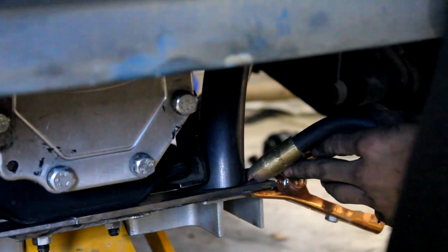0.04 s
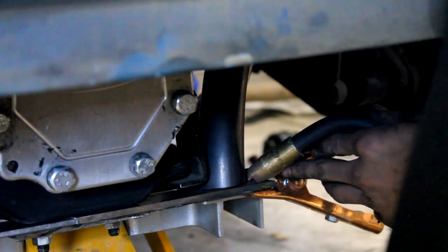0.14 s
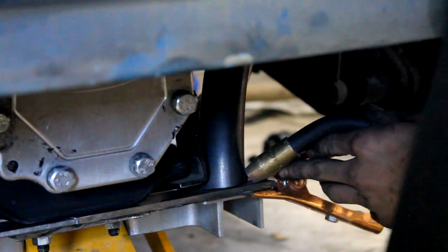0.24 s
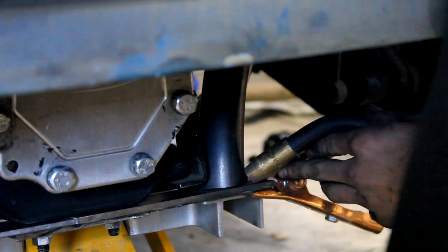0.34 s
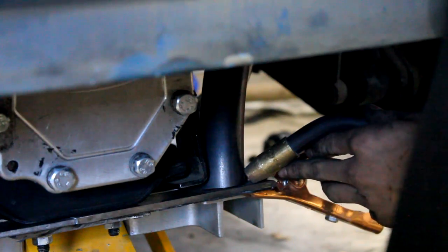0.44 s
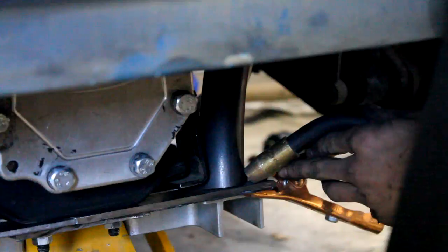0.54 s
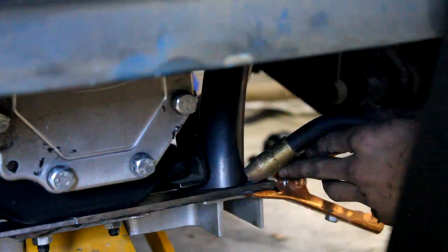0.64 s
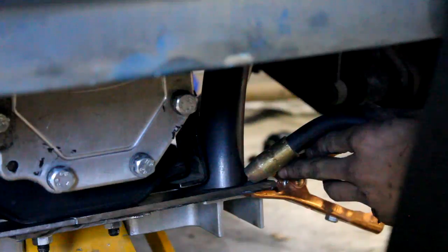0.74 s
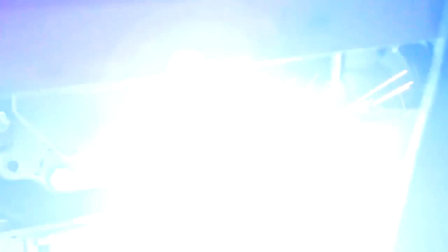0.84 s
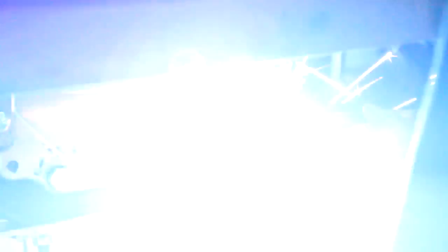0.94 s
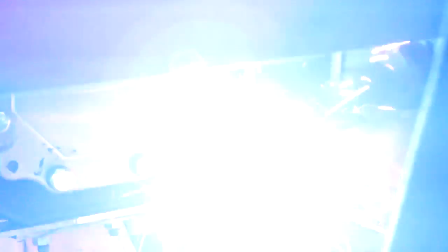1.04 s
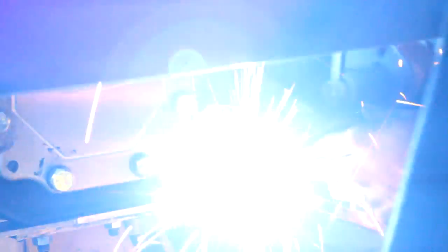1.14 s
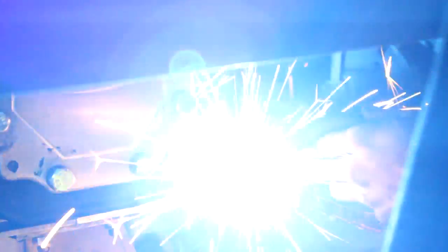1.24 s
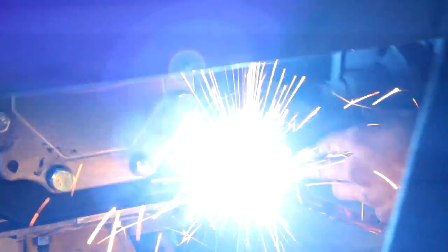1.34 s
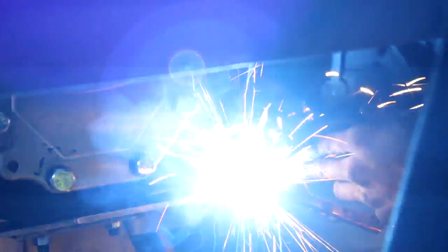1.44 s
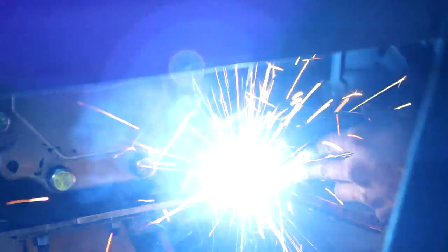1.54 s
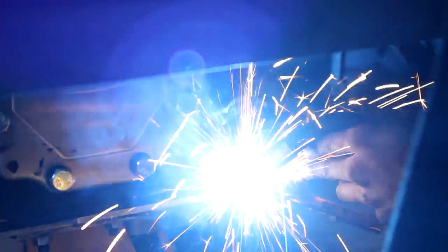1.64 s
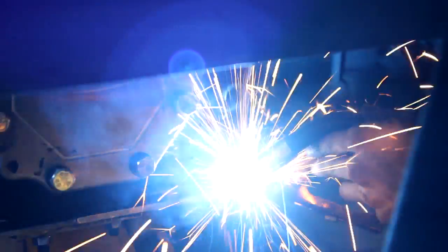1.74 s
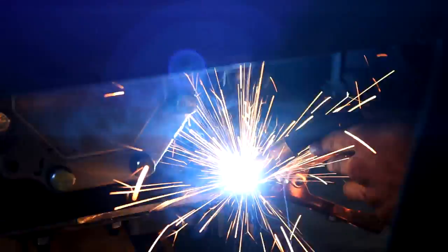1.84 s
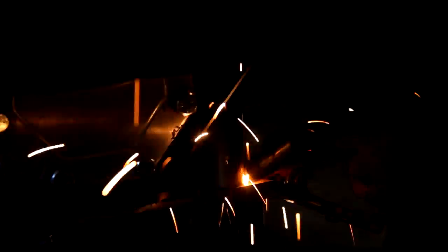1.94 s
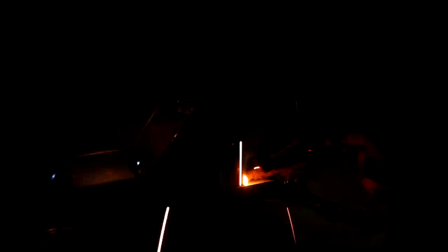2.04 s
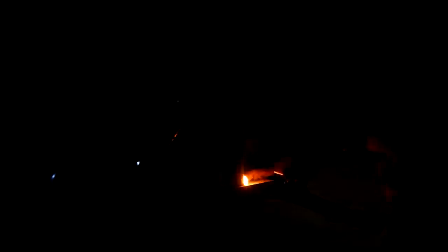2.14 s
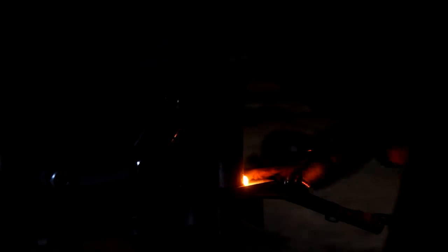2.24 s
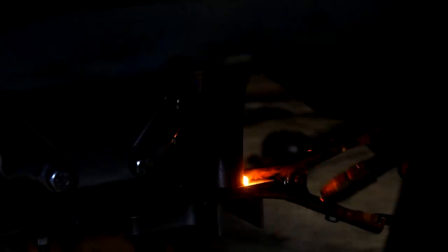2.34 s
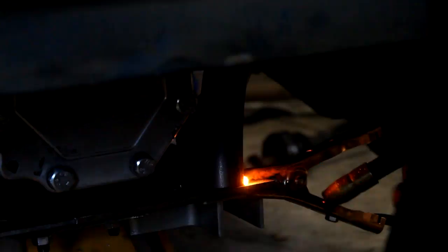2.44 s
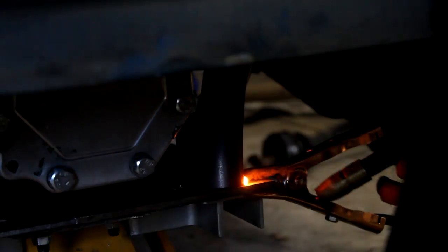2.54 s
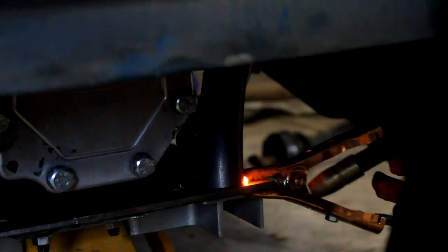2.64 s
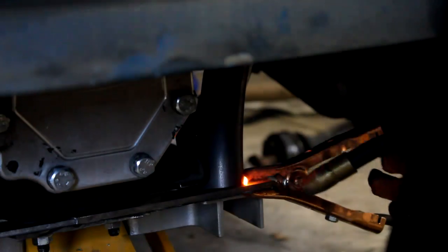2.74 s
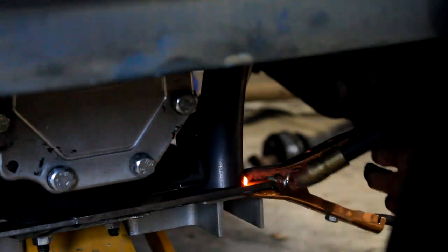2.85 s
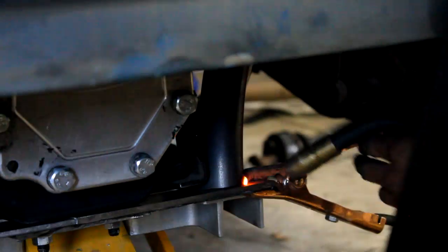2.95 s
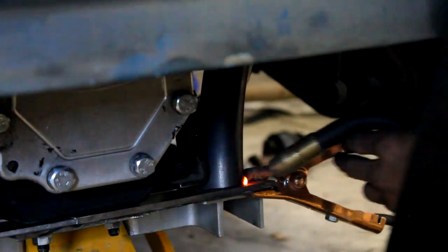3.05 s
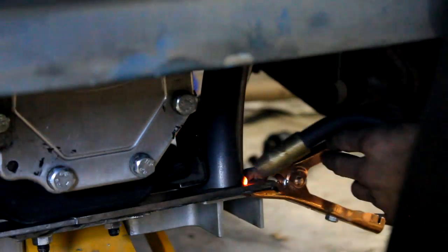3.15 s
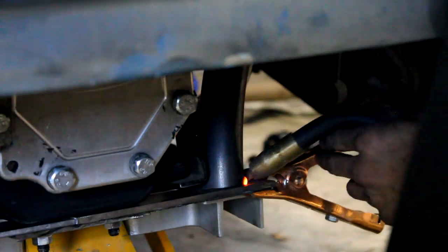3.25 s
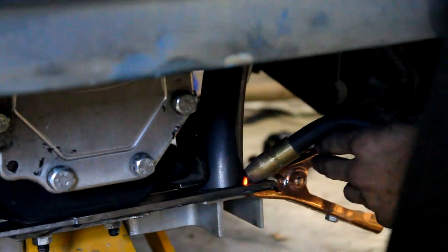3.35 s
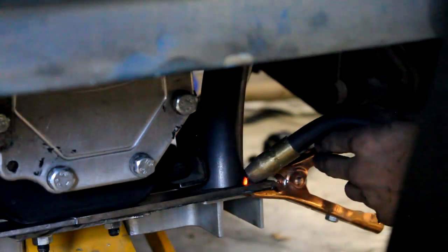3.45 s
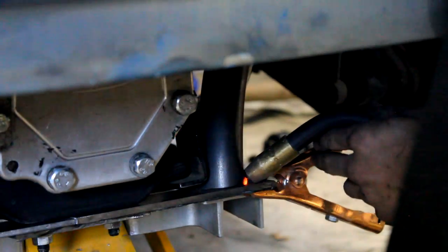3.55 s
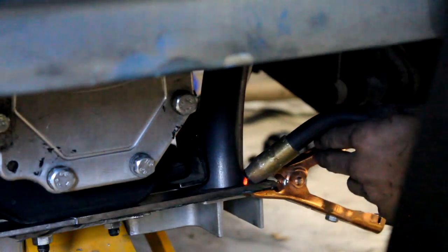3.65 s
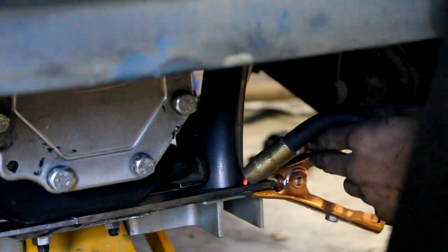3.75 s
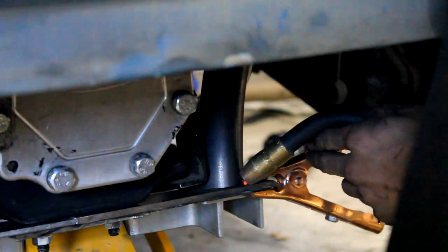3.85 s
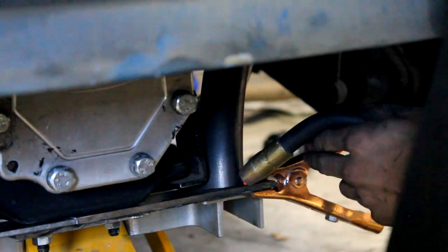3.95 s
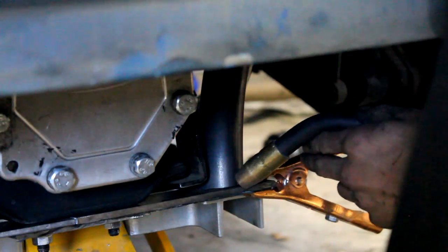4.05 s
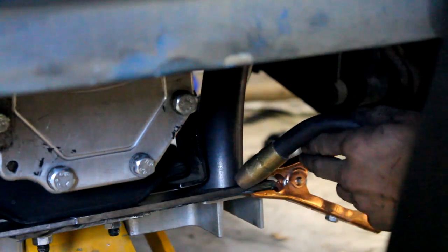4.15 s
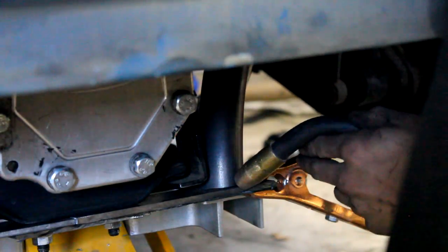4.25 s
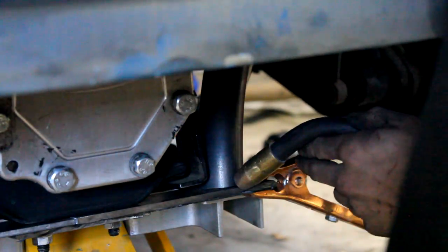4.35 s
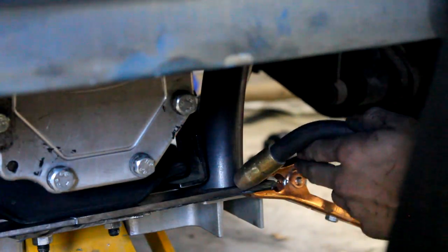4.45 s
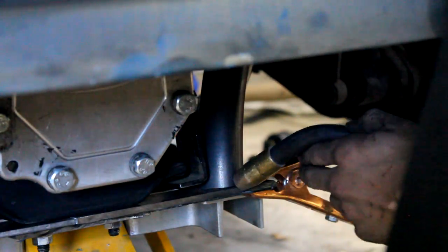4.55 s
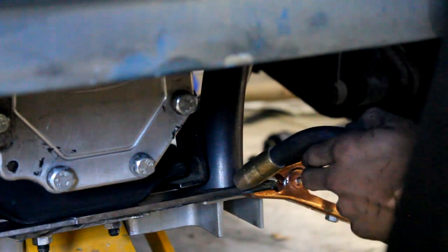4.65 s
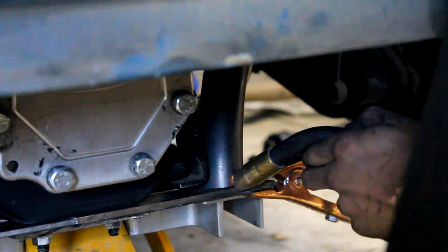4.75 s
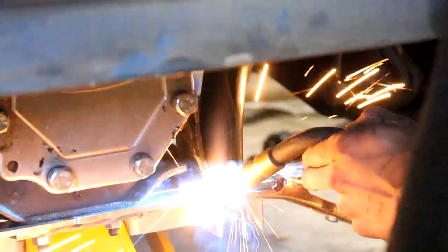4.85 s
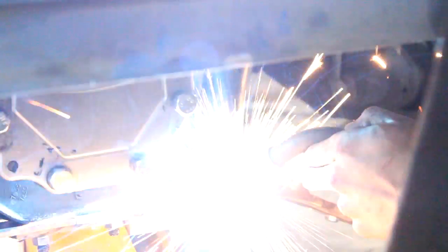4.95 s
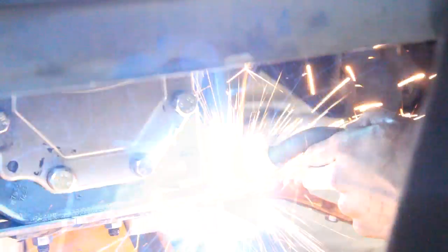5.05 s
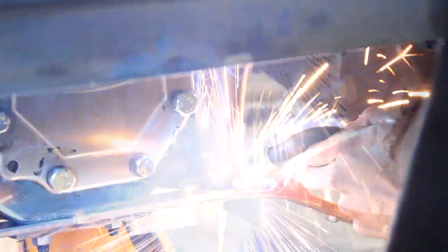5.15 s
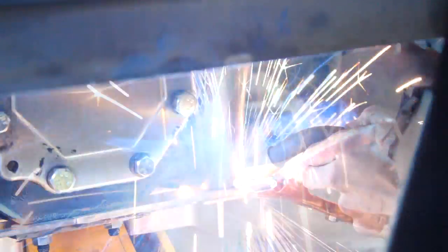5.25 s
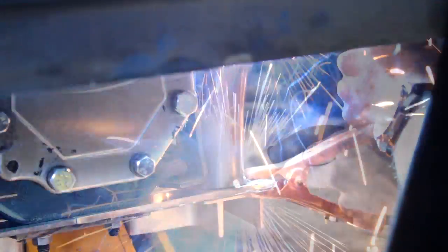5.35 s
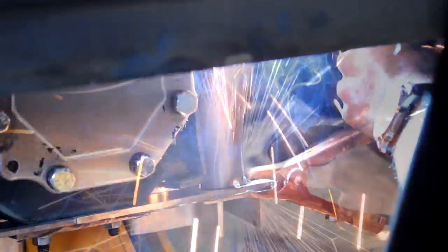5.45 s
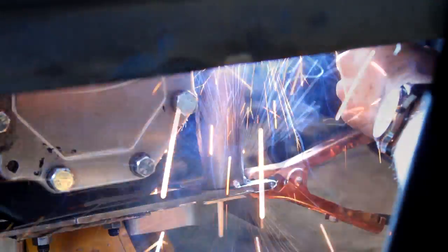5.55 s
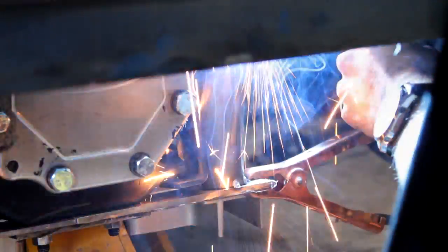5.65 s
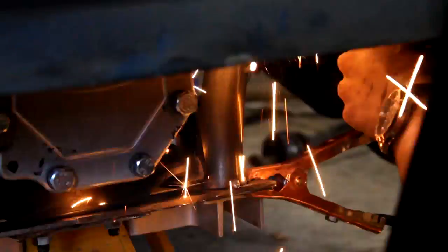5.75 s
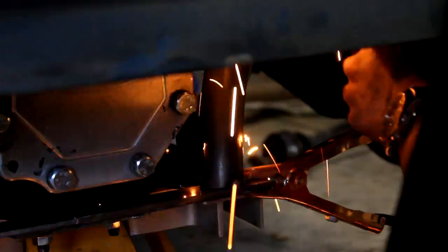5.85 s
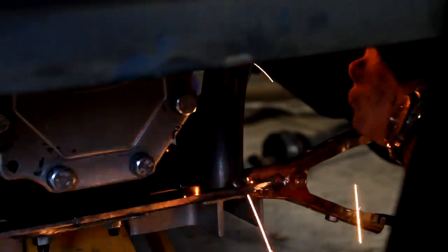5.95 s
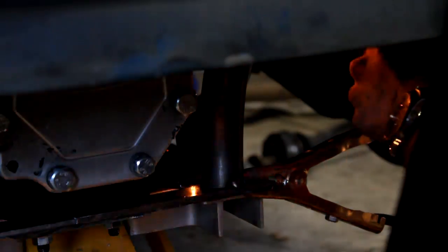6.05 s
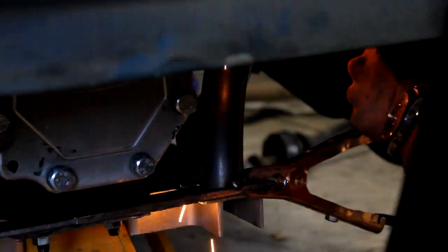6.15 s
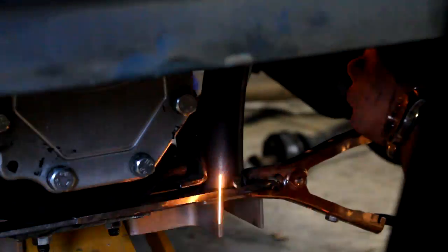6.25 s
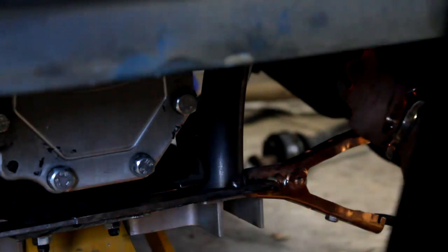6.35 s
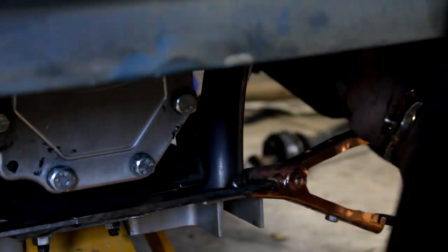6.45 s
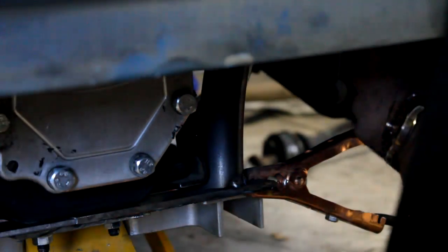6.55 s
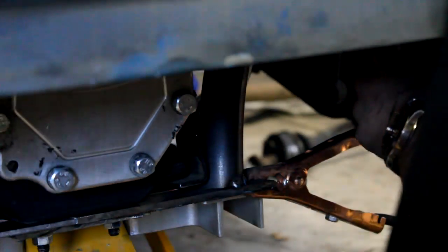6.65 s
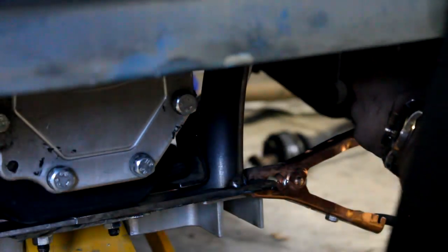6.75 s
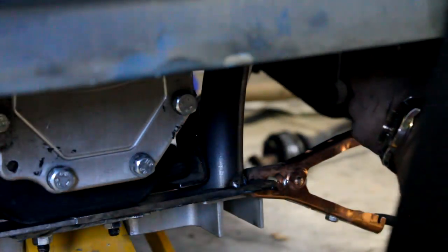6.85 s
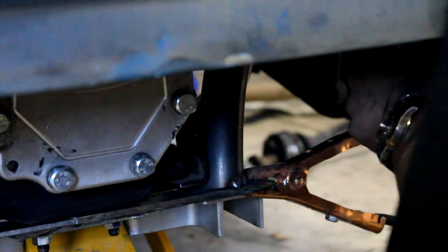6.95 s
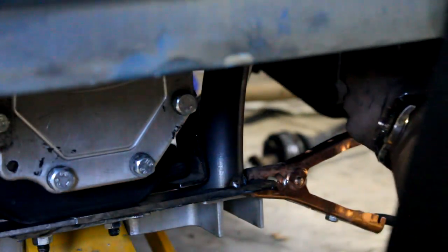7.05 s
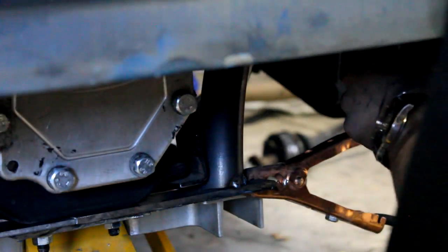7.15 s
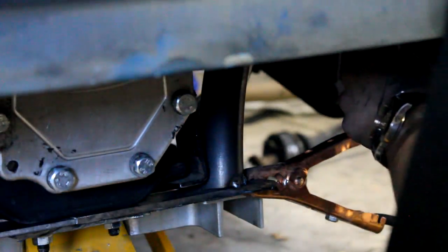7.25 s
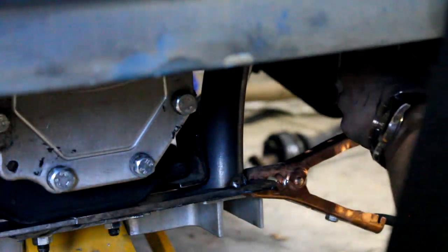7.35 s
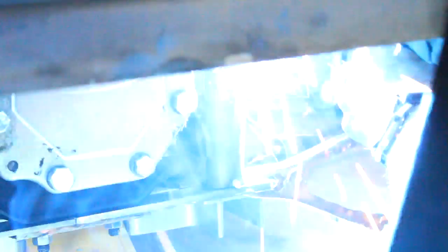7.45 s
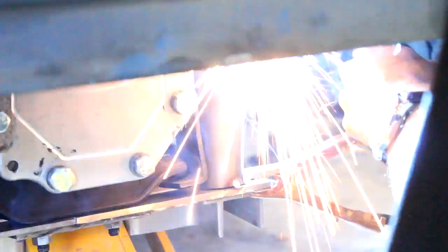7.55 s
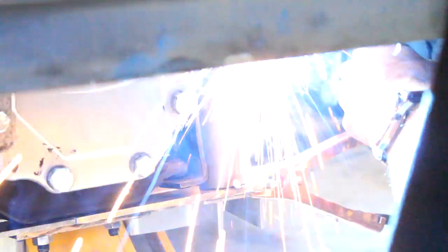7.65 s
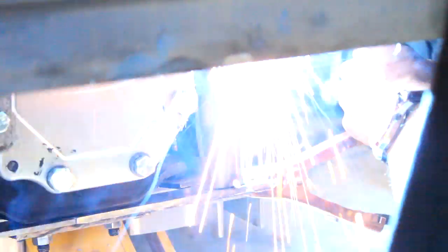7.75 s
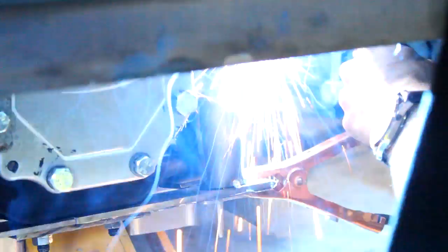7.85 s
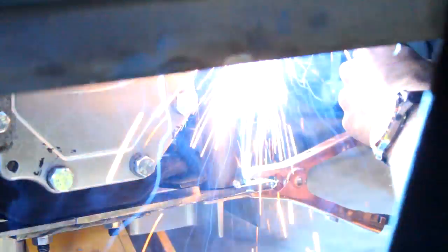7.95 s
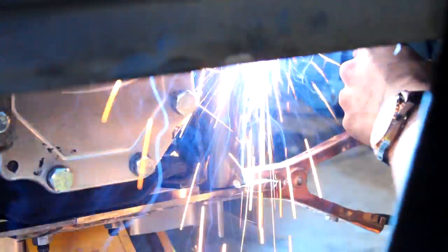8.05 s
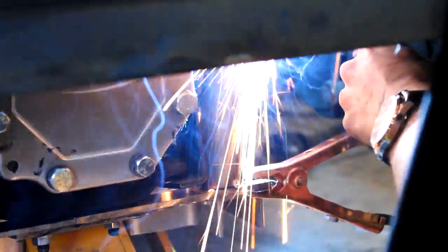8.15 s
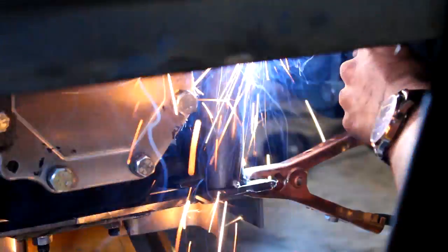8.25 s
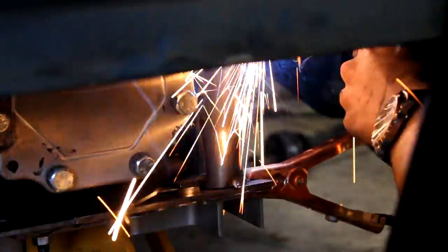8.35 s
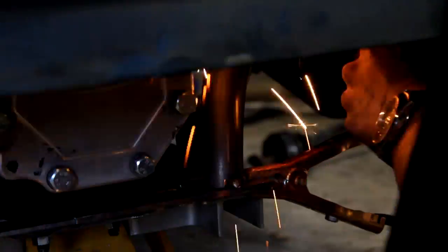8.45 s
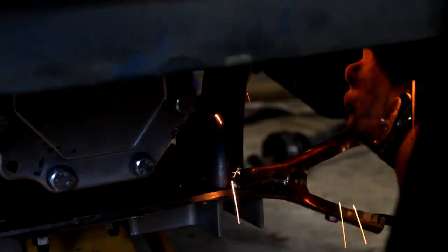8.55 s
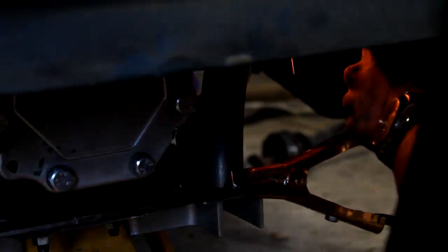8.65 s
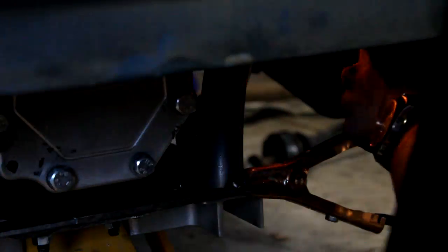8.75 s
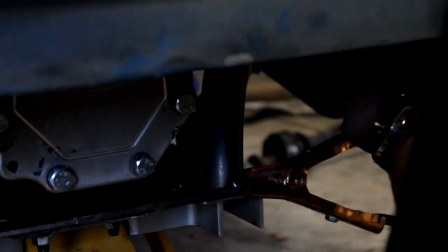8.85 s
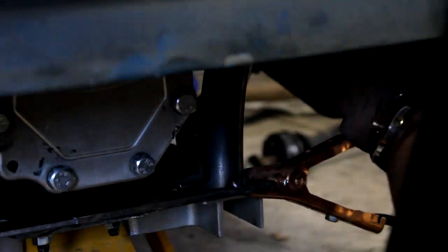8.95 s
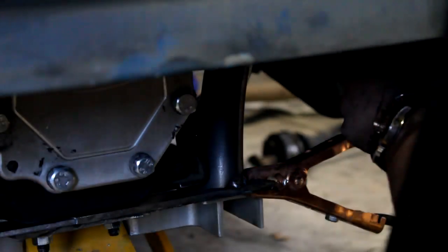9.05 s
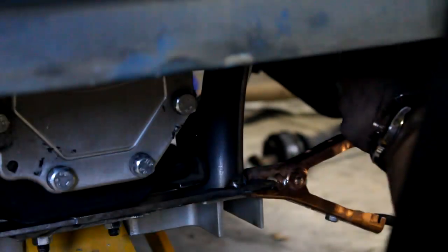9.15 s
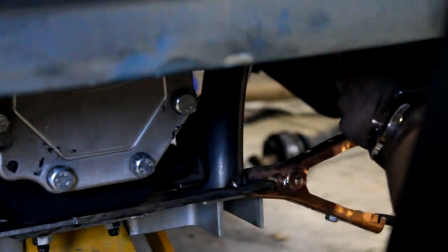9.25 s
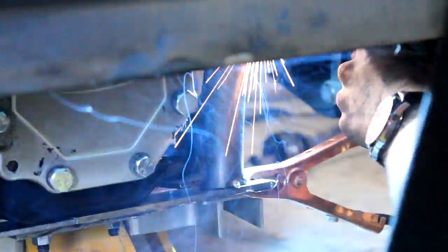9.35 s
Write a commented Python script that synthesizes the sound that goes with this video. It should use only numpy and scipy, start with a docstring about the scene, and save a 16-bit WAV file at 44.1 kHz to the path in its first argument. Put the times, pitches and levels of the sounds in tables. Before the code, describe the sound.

Close, bright welding tacks snap and pop on steel tube under a car, separated by quiet fan hum and tiny metallic ticking.

```python
"""In a garage, a wire-feed welder lays three tack welds on a steel tube under a car, close to the microphone.
A fan hums and faint ticks go on throughout. At 0.9 s the wire strikes with loud pops; the first tack follows,
its wire shorting and snapping about once per mains ripple, each snap scattering off the steel into the room.
At 3.4 s the torch clinks as it is set down. A hard strike with a puff of air opens the second tack at 4.9 s;
weaker pops begin the third at 7.5 s, which settles into an even buzz and fades, leaving the fan and ticks."""
import sys
import numpy as np
from scipy import signal
from scipy.fft import rfft, irfft
from scipy.io import wavfile
from scipy.ndimage import uniform_filter1d

SR = 44100
rng = np.random.default_rng(int(sys.argv[2]) if len(sys.argv) > 2 else 0)


def dump(signal):
    """Clip the signal to [-1, 1] and save it as 16-bit WAV at the path in sys.argv[1]."""
    limited = np.clip(np.atleast_2d(signal).T, -1, 1)
    pcm = np.round(limited * 32767).astype(np.int16)
    wavfile.write(sys.argv[1], SR, pcm)


N = 414540
TIME = np.arange(N) / SR  # seconds


def undb(db):
    """Turn decibels into a gain."""
    return 10 ** (np.asarray(db) / 20)


def unit(x):
    """Scale a sound to an rms level of 1."""
    return x / np.sqrt(np.mean(x ** 2))


def along(table, hz):
    """Read between (Hz, value) points, with pitch on a log scale."""
    f, value = np.transpose(table)
    return np.interp(np.log(hz + 1e-3), np.log(f), value)


def through(x, response):
    """Pass a sound through an impulse response."""
    return signal.oaconvolve(x, response)[:len(x)]


def clicks(times, sizes):
    """Place one single-sample click at each time in seconds."""
    places = np.clip(np.asarray(times) * SR, 0, N - 1).astype(int)
    return np.bincount(places, sizes, N)


def noise(gain):
    """Make noise of rms 1 whose spectrum follows gain(Hz)."""
    spectrum = rfft(rng.standard_normal(N))
    return unit(irfft(spectrum * gain(np.fft.rfftfreq(N, 1 / SR)), N))


def wander(rate_hz):
    """Drift slowly at random, with a spread of 1."""
    return noise(lambda hz: (hz > rate_hz / 2) * np.exp(-(hz / rate_hz) ** 2))


def fading(fall_s, size=1024):
    """An envelope with a sudden start and an exponential fall."""
    return np.exp(-np.arange(size) / SR / fall_s)


def lasting(length_s, size=1024):
    """An envelope with a sudden start, a plateau and a quick end."""
    return np.exp(-(np.arange(size) / SR / length_s) ** 8)


def colour(spectrum, modes=(), size=4096):
    """A response of unit energy that never sounds early: a broad spectrum lifted by resonances."""
    hz = np.fft.rfftfreq(size, 1 / SR)
    db = along(spectrum, hz)
    for f, width, lift in modes:
        db = db + lift * .5 ** ((2 * (hz - f) / width) ** 2)
    # keeping only the first half of the cepstrum packs the energy towards the start
    cepstrum = irfft(np.log(undb(db)))
    h = irfft(np.exp(rfft(2 * cepstrum[:size // 2], size)))
    return h / np.linalg.norm(h)


def scatter(gate, count=4):
    """A nearly colourless cluster of echoes, of unit energy, shaped by an envelope."""
    h = rng.standard_normal(len(gate)) * gate
    for _ in range(count):
        h = irfft(np.exp(1j * np.angle(rfft(h))))  # make every pitch equally strong
        local_power = uniform_filter1d(h ** 2, size=24)
        h = h * gate / np.sqrt(local_power + 1e-9)  # put the envelope back
    return h / np.linalg.norm(h)


# How long the garage rings. Each row: pitch in Hz, time to fall by 60 dB in seconds.
GARAGE_DECAY = [(300, 0.44), (2600, 0.63), (7000, 0.37), (14000, .27)]


def garage(early_db=-7, early_fall_s=.018, late_db=-4.0, size=32768):
    """Echoes from the car and the floor, then the room's tail, whose high treble dies away soonest."""
    t, hz = np.arange(size) / SR, np.fft.rfftfreq(size, 1 / SR)
    band = hz // 1500  # slices 1500 Hz wide, each with its own decay
    spectrum = rfft(rng.standard_normal(size))
    late = 0
    for b in np.unique(band):
        t60 = along(GARAGE_DECAY, hz[band == b].mean())
        late = late + irfft(spectrum * (band == b)) * 1000 ** (-t / t60)
    arrived = t > .004
    early = scatter(arrived * fading(early_fall_s, size=size), count=1)
    return undb(early_db) * early + undb(late_db) * arrived * late / np.linalg.norm(late)


# The rushing air of the fan. Each row: pitch in Hz, relative level in dB.
FAN_RUSH = [(25, -21.5), (60, -18), (95, -6.5), (135, -13.5), (170, -4.5), (255, -2), (320, -9), (550, -5),
            (850, -7.5), (1400, -11.5), (2500, -17.5), (4400, -22.5), (7000, -36.5), (11000, -35),
            (15500, -49.5)]
# The hum of the fan. Each row: pitch in Hz, level in dB before the shared hum_db.
FAN_HUM = [(53.8, -79.5), (91.5, -62.5), (220.7, -53.5), (409.1, -56.5), (662.1, -58), (759.0, -53),
           (1066, -78), (1222, -58), (1502, -58), (2309, -63)]


def fan(rush_db=-46.5, hum_db=-2, blur=0.019):
    """Rushing air, with wavering tones made of narrow noise, wider the higher they lie."""
    rush = undb(rush_db) * noise(lambda hz: undb(along(FAN_RUSH, hz)))
    tones = 0
    for f, db in FAN_HUM:
        tone = noise(lambda hz: 1 / (1 + ((hz - f) / (blur * f)) ** 2))
        tones = tones + undb(db + hum_db) * tone
    return rush + tones


# The broad colour of the ticks. Each row: pitch in Hz, relative level in dB.
TICK_SPECTRUM = [(1000, -22.5), (3000, 0.5), (5500, -3.5), (9500, -2), (13000, -8), (15500, -16)]
# The ringing of the ticks. Each row: pitch in Hz, width in Hz, lift in dB.
TICK_MODES = [(5550, 220, 7), (6980, 58, 6), (9150, 70, 6.2), (11050, 110, 3.8)]


def ticking(faint_db=-33.5, spread_db=8, rarity=1.9, near=0.3, count=480):
    """Small dry ticks at random, a few clear ones among many faint ones, heard mostly through the room."""
    when, size = rng.random((count, 2)).T
    times = (np.arange(count) + 2 * when) / count * N / SR
    ticks = clicks(times, undb(faint_db + spread_db * size ** rarity))
    x = through(ticks, colour(TICK_SPECTRUM, TICK_MODES))
    return near * through(x, scatter(fading(.005))) + through(x, garage(early_db=-12.5, late_db=0.5))


# The wire pops, as the arc is struck or when it stubs into the puddle.
# Each row: time in seconds, relative strength in dB.
WIRE_POPS = [(0.8752, -16.5), (0.889, -15.5), (0.9149, 2.5), (0.9682, 1), (0.9804, 5), (1.037, 7),
             (4.8635, 8), (4.9406, 0), (4.9574, 4), (4.9826, 5.5), (5.225, 3), (5.3217, 6.5), (5.443, 4),
             (5.781, 1), (7.4708, -3), (7.5708, 0.5), (7.5879, -4.5), (7.8483, 0), (7.9498, 2.5),
             (8.036, 1)]


def pops(start, stop, pop_db=14, pop_lag_s=0.00094):
    """The bare bursts of one tack, as single clicks: each burst sounds pop_lag_s after its listed time."""
    at, db = np.transpose(WIRE_POPS)
    mine = (at > start - .5) & (at < stop + .5)
    return clicks(at + pop_lag_s, mine * undb(db + pop_db))


SPUTTER = .7  # unsteadiness of a freshly lit arc, 0-1
SETTLE_S, ENDING_S = .07, 0.14  # seconds to find the even buzz, and for the wire feed to run down
WOBBLE_HZ, WOBBLE_DB = 12, 0.16  # the hand varies the arc's length, and with it the level


def effort(settles, stop, sputter_db, settled_db, ending_db, settled_unsteady):
    """Level in dB and unsteadiness of one arc: it sputters, settles, then holds, fades or flares."""
    settled = np.clip(.5 + (TIME - settles) / SETTLE_S, 0, 1)
    ending = np.clip(1 + (TIME - stop) / ENDING_S, 0, 1)
    db = sputter_db + (settled_db - sputter_db) * settled
    db = db + ending_db * ending + WOBBLE_DB * wander(WOBBLE_HZ)
    return db, SPUTTER + (settled_unsteady - SPUTTER) * settled


RIPPLE_HZ = 120  # ripples per second of the rectified mains


def arc(start, stop, db, unsteady, arc_db=-1.45, timing_s=.0018, size_db=2.0, spit_db=-8.5, sizzle_db=-17):
    """The wire shorts once per ripple, early or late when unsteady; spatter spits and the arc sizzles between."""
    beats = np.arange(N * RIPPLE_HZ // SR) / RIPPLE_HZ
    late, size, spit_size, spit_at = rng.standard_normal((len(beats), 4)).T
    loose = np.interp(beats, TIME, unsteady)
    # an unsteady arc varies more in both timing and strength
    snap_gain = undb(size_db * (1.0 + loose) * np.minimum(size, 1.5))
    snaps = clicks(beats + timing_s * loose * late, snap_gain)
    spit_gain = loose * undb(spit_db + 3.1 * np.minimum(spit_size, 2))
    spits = clicks(beats + spit_at / RIPPLE_HZ, spit_gain)
    sizzle = undb(sizzle_db) * rng.standard_normal(N)
    burning = (TIME > start) & (TIME < stop)
    return burning * undb(db + arc_db) * (unit(snaps + spits) + sizzle)


def nearby(x, indirect, crack_s=.0005, steel_s=.004, sway_hz=0.4954):
    """A snap arrives as a short crack and a cluster of echoes off the steel."""
    share = np.clip(indirect, 0, 1)
    sound = through(x * np.sqrt(1 - share), scatter(lasting(crack_s)))
    sway = 2 * np.pi * sway_hz * TIME  # the hand moves, so one set of echo paths gives way to another
    for weight in (np.cos(sway), np.sin(sway)):
        sound = sound + through(x * np.sqrt(share) * weight, scatter(lasting(steel_s)))
    return sound


# The three tacks. Each row: arc lights in seconds, settles in seconds, goes out in seconds,
# relative sputtering level in dB, relative settled level in dB, change at the end in dB,
# settled unsteadiness from 0 to 1, share of the sound's energy that comes by way of the steel from 0 to 1.
TACK_WELDS = [(1.045, 1.35, 1.92, -11.7, -11.5, 0, .33, .3),
              (4.96, 5.25, 5.805, -9.3, -12.6, 3.5, .55, .35), (7.6, 8.12, 8.42, -16, -8.7, -4.5, .15, .75)]
# The colour of a snap. Each row: pitch in Hz, relative level in dB at the first, second and third torch position.
SNAP_COLOUR = [(130, -31, -39, -37.5), (246, -16.5, -29.5, -16), (450, -18.5, -20.5, -18),
               (704, -14, -18.5, -11.5), (3500, -15, -14, -10.5), (5300, -5.5, -9, -4), (6160, -3, -1, 4),
               (7130, -2, -7, -1), (7580, -13, -12.5, -10), (9330, 1, -6, -2), (10680, 1, 2.5, 0.5),
               (12400, -6.5, -5.5, 0), (12900, -18.5, -13, -7), (14100, 0.5, -2.5, -1.5),
               (14800, -3, -5.5, -5)]
# The ringing of the tube and frame. Each row: pitch in Hz, width in Hz,
# lift in dB at the first, second and third torch position (the room softens the lifts).
STEEL_MODES = [(1490, 270, 3, 7.5, 9), (1738, 150, 4.5, 0, -5), (2150, 240, -1, -1.5, 4),
               (2444, 170, 8, 2, -4), (4183, 77, 6, 5, -0.5), (4520, 420, 0.5, 3.5, 4.5),
               (5805, 70, -7, -4.5, -14), (6180, 49, 1, -2, -0.5), (6160, 63, -2.5, 2.5, 4),
               (6610, 63, -4, 5.5, 6), (6830, 42, 5, 6, -12.5), (7065, 56, -2, 0.5, 8),
               (9280, 120, -5, 1.5, 6), (10120, 230, -4, 1, 9), (11200, 79, 11, 0.5, -7),
               (14860, 84, 3.5, 9.5, 5)]


def welds(pop_s=0.0037, room_ring=0.86):
    """Three tacks, each with its strikes and torch position; a pop is a short, fading volley of snaps."""
    out = 0
    for k, (start, settles, stop, sputter_db, settled_db, ending_db, unsteady, indirect) in enumerate(TACK_WELDS):
        spectrum = [(hz, dbs[k]) for hz, *dbs in SNAP_COLOUR]
        modes = np.array([(hz, width, lifts[k]) for hz, width, *lifts in STEEL_MODES])
        bursts = pops(start, stop)
        level_db, looseness = effort(settles, stop, sputter_db, settled_db, ending_db, unsteady)
        snaps = arc(start, stop, level_db, looseness)
        close = nearby(snaps, indirect) + through(bursts, scatter(fading(pop_s)))
        near = through(close, colour(spectrum, modes))
        # the room gathers sound from all directions, so the resonances stand out less in it
        far = through(through(snaps + bursts, garage()), colour(spectrum, modes * [1, 1, room_ring]))
        out = out + near + far
    return out


# The hot gas round the arc flutters. Each row: pitch in Hz, relative level in dB.
GAS_FLUTTER = [(10, -19.5), (30, -9), (70, -6.5), (150, 8), (280, 1.5), (600, -11.5), (2000, -45.5)]


def flutter(flutter_db=-52):
    """A low, rough rumble of shaped noise while the arc burns."""
    burning = sum((TIME > start) & (TIME < stop) for start, _, stop, *_ in TACK_WELDS)
    smooth = uniform_filter1d(1. * burning, size=1024)
    return undb(flutter_db) * smooth * noise(lambda hz: undb(along(GAS_FLUTTER, hz)))


# The ringing of the torch nozzle. Each row: pitch in Hz, relative level in dB, time to fall by 60 dB in seconds.
NOZZLE_MODES = [(5588, 0, 0.081), (9227, -13, 0.082), (13970, -19, 0.15), (14800, -27, 0.39)]


def nozzle(touch_s=3.4255, peak_db=-49):
    """A tiny brass clink as the torch is set down: a few dying sine tones."""
    age = np.maximum(TIME - touch_s, 0)
    ring = 0
    for hz, db, t60 in NOZZLE_MODES:
        ring = ring + undb(db) * np.sin(2 * np.pi * hz * age) * np.exp(-np.log(1000) * age / t60)
    return undb(peak_db) * ring / np.abs(ring).max()


def puff(puff_s=4.8646, rise_s=.0002, fall_s=.0016, puff_db=-3, knock_hz=480, knock_share=0.2):
    """The hardest strike pushes air one way, which knocks in the cavity under the car."""
    age = np.maximum(TIME - puff_s, 0)
    push = (1 - np.exp(-age / rise_s)) * np.exp(-age / fall_s)
    knock = 1 + knock_share * np.sin(2 * np.pi * knock_hz * age)
    return -undb(puff_db) * push * knock


def scene():
    """Everything added together at one microphone."""
    return (fan() + ticking() + welds() + flutter() + nozzle() + puff())[None]


def record(dry, ceiling=0.99, top_hz=15700):
    """The loudest snaps overload the recorder and are rounded off; it then cuts the highest treble."""
    held = dry / (1 + (dry / ceiling) ** 4) ** (1 / 4)
    low_pass = signal.ellip(10, .2, 70, top_hz, fs=SR, output="sos")
    return signal.sosfilt(low_pass, held)


dry = scene()
out = record(dry)
dump(out)
```